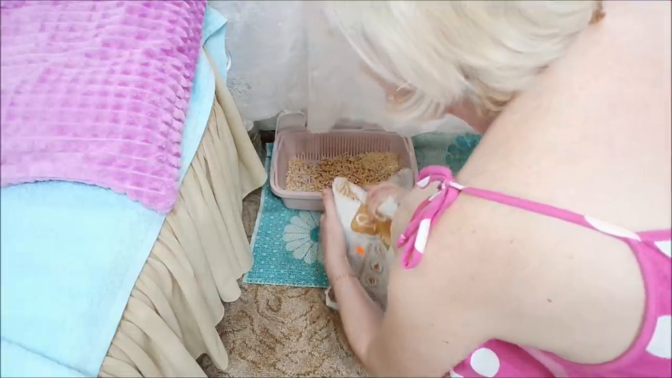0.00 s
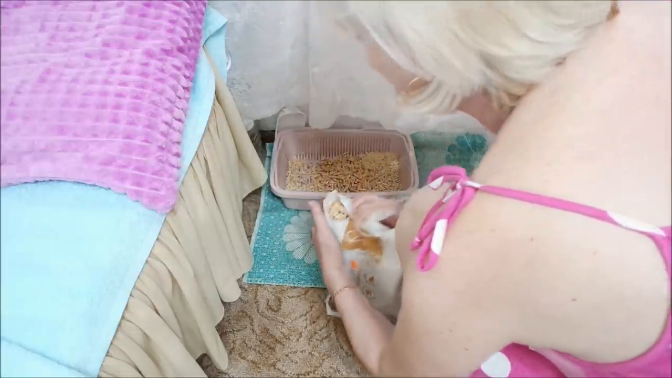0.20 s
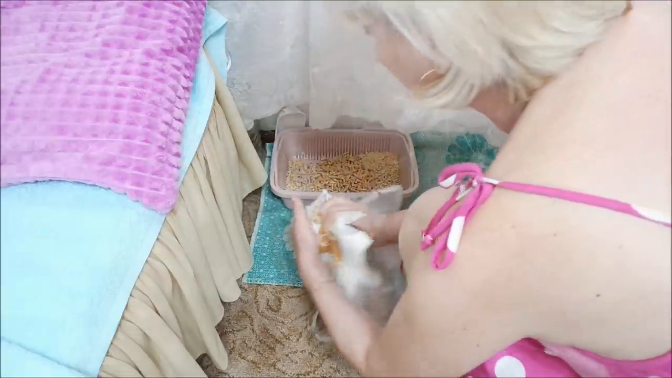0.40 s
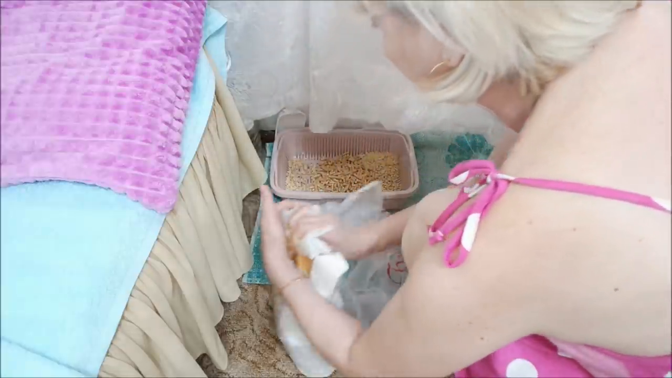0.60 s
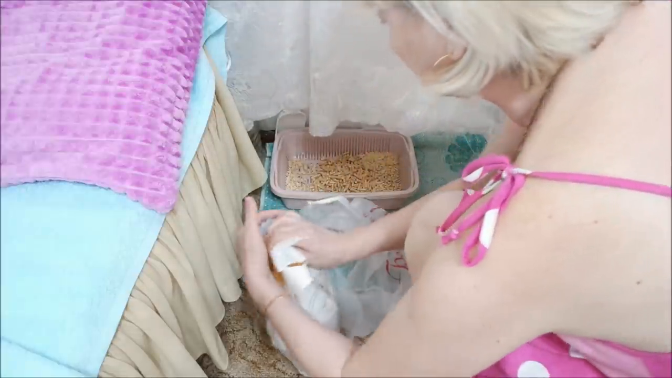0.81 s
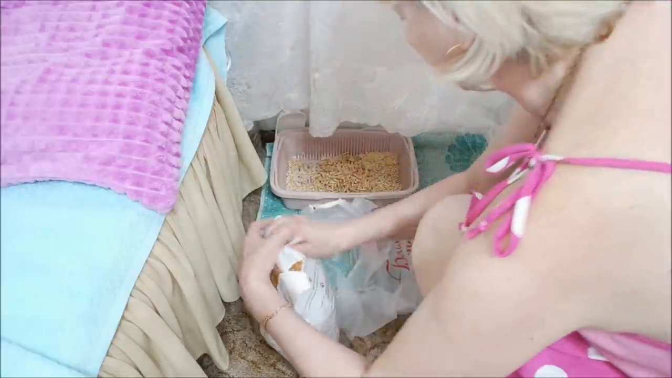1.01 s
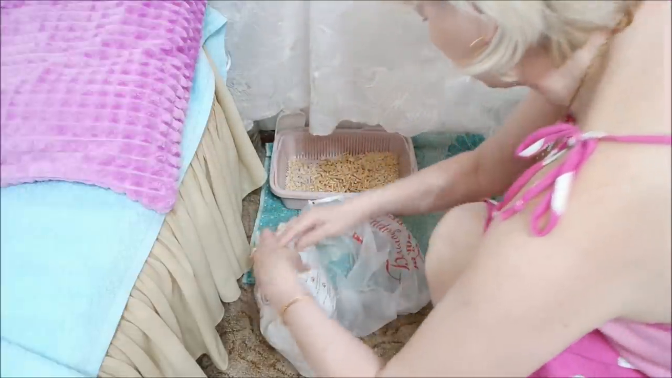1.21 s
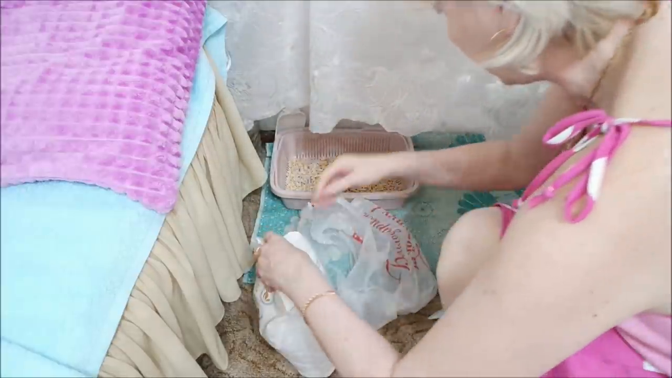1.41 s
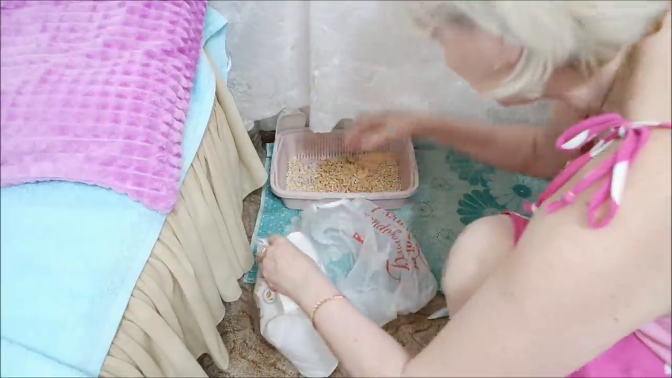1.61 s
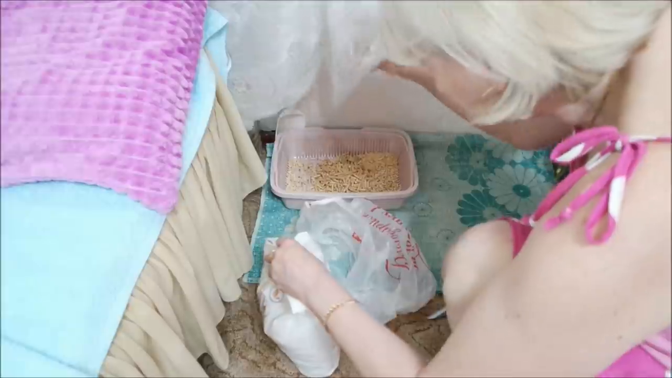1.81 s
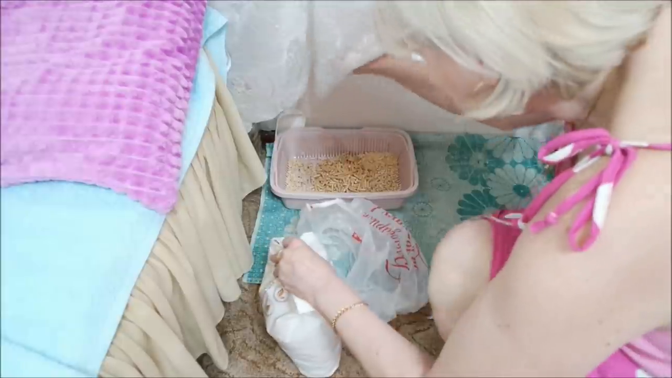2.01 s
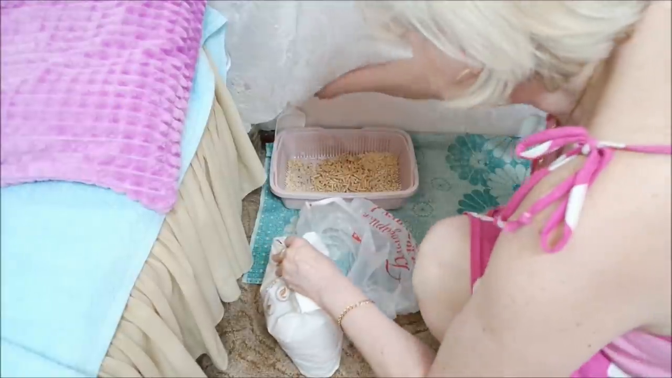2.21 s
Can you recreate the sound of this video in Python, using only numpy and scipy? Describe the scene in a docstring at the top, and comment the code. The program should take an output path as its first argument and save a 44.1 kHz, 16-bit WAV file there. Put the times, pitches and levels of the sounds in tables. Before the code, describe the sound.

A thin plastic bag holding litter pellets is folded by hand, crackling sharply with pellets clicking inside and soft floor bumps, then thins to sparse ticks and a light tray knock; small furnished room, close microphone.

```python
"""Folding a bag of pellets

Hands fold a thin plastic bag of cat litter pellets on the floor of a small furnished room, then let it go.
Creases snap (shaped noise bursts) over a fine crinkle (showers of tiny clicks); pellets shift and click inside.
The bag bumps the floor softly (clusters of low tones). As the film relaxes the snaps thin out, and the
plastic tray takes a light knock (fading tones). Behind it lie quiet room noise and a faint low hum."""
import sys
import numpy as np
from scipy import signal
from scipy.fft import rfft, irfft
from scipy.io import wavfile
from scipy.ndimage import uniform_filter1d

SR = 44100
rng = np.random.default_rng(int(sys.argv[2]) if len(sys.argv) > 2 else 0)


def output_pcm(signal):
    """Save a mono or channel-first signal as 16-bit PCM at the path in sys.argv[1].

    Samples are clipped to [-1, 1] before scaling.
    """
    pcm = np.clip(np.atleast_2d(signal).T, -1, 1) * 32767
    wavfile.write(sys.argv[1], SR, np.round(pcm).astype(np.int16))


N = 101430  # length in samples, 2.3 seconds

# Large creases of the bag. Each row: start in seconds, level at 2.5 kHz in dB before SNAP_DB is added,
# levels at 450 Hz, 1.2 kHz, 5.5 kHz and 11 kHz in dB relative to that at 2.5 kHz, main resonance in Hz.
CREASES = [(0.233, -25.5, 6, 5, -2.5, -10, 990), (0.251, -27.5, -13, 6.5, 0, -12, 1020),
           (0.265, -21, 6.5, 3.5, 0, -3.5, 3900), (0.342, -23, -9.5, 2.5, -2.5, -3.5, 680),
           (0.404, -31, -7, -13, 5.5, -4, 4700), (0.437, -37, -9, -1, 5, 4.5, 3040),
           (0.479, -23, -3, -7, 0.5, -1, 4530), (0.4835, -19.5, 3, 0, -2.5, -25, 4580),
           (0.535, -23, -5, -1, 2.5, -1, 1620), (0.5453, -17, -8, -0.5, 1.5, 2.5, 1710),
           (0.567, -27, -8, 5, 4, 3, 1230), (0.583, -13.5, -1, -10.5, -7, 1.5, 3400),
           (0.679, -24, -25, 8, -2, -1, 1450), (0.682, -23, -13, 10.5, 0, -20, 1240),
           (0.778, -18.5, 2, -8.5, -4, -13, 2500), (0.868, -27, -7, -11, -6, -7, 2720),
           (1.0034, -26.5, -2, -1.5, 2.5, -14, 2960), (1.05, -22, 1.5, -11, -8.5, -10, 2800),
           (1.094, -25.5, -5, -12, -1, -28, 1750), (1.12, -36.5, -12, -16, -7, 9, 6000),
           (1.139, -22, -24, -3, -7, -13.5, 2160), (1.195, -24, -0.5, 1, -9, -29, 2920),
           (1.2128, -25, 2.5, -12, -8, -13, 2180), (1.263, -16.5, -15, 3.5, -10, -12.5, 2000),
           (1.291, -25, -15, -23, -10, -12, 3170), (1.326, -24, 1, -4, -8, -9, 2500),
           (1.3453, -18.5, -4, -9, -7.5, -14, 2140), (1.4086, -24.5, -8, 2, -4.5, -10, 2700),
           (1.439, -24.5, -3, -8, 1.5, -27, 2640), (1.4461, -14.5, -2.5, -2.5, -6.5, -3, 2720),
           (1.4773, -16.5, -8, -2.5, -2.5, -7.5, 2130), (1.521, -26, -22, -5, -10, -13, 1630),
           (1.564, -31, -6, 2, -1.5, -30, 4350), (1.575, -29.5, -18, -2, -5, -18, 2170),
           (1.593, -19.5, -2.5, -14.5, -5.5, -3, 1900), (1.609, -29, -15, 8, -3, -10, 1670),
           (1.6509, -33.5, -8, 1, -3, -51, 1600), (1.67, -29, -11, 3.5, -1, -44, 940),
           (1.681, -36, -21, -15, 1, 1, 1130), (1.693, -18.5, -10, -2.5, -4.5, -6, 1020),
           (1.8512, -30.5, -11, -3, -3.5, -9, 1030), (1.9, -26.5, -6, -5.5, -14.5, -25, 1210),
           (1.941, -30.5, -5, -8, -6.5, -2.5, 2640), (1.954, -33.5, -4, -2, -8, -11, 2850),
           (1.997, -20.5, -9.5, 0.5, -5, -3.5, 1140), (2.085, -37.5, 2.5, -0.5, 3.5, -11.5, 4900),
           (2.159, -30.5, 8.5, -5.5, 2, -4.5, 1045), (2.2519, -40, 0, 4.5, 3, -4.5, 1010)]
# Frequencies at which the colour of a snap is set, in Hz.
SNAP_BANDS_HZ = [30, 130, 450, 1200, 2500, 5500, 11000, 16000]
# Handling of the film. Each row: time in seconds, level in dB before CRINKLE_DB is added.
CRINKLE_LEVEL = [(0, -41), (.14, -46.5), (.22, -45.5), (.27, -39), (.31, -37.5), (.36, -31.5), (.45, -39),
                 (.5, -26), (.56, -31), (.63, -31), (.69, -31), (.75, -45), (.81, -38.5), (.98, -44),
                 (1.06, -40.5), (1.18, -39.5), (1.25, -32), (1.38, -44), (1.47, -32), (1.54, -49),
                 (1.73, -42), (1.82, -54.5), (1.9, -52), (2.05, -67), (2.14, -65), (2.3, -57)]
# Colour of the crinkle. Each row: frequency in Hz, relative level in dB.
CRINKLE_COLOUR = [(100, -22), (500, -23), (1200, 6), (2300, -15.5), (3500, -2.5), (5500, -0.5),
                  (8000, -0.5), (11500, 2), (15000, 2.5)]
# Pellets shifting in the bag. Each row: time in seconds, level in dB before PELLET_DB is added.
PELLET_LEVEL = [(0, -42.5), (.07, -53.5), (.16, -57.5), (.22, -41), (.26, -38.5), (.33, -42), (.39, -40),
                (.44, -45.5), (.49, -31.5), (.57, -32), (.64, -37), (.69, -32.5), (.75, -41.5), (.8, -45),
                (.97, -45), (1.07, -42), (1.18, -43), (1.26, -39.5), (1.38, -42.5), (1.46, -38),
                (1.55, -63), (1.7, -46), (1.8, -58), (1.93, -65), (2.14, -71), (2.3, -65)]
# Colour of the shifting pellets. Each row: frequency in Hz, relative level in dB.
PELLET_COLOUR = [(30, -34), (70, -5.5), (130, -1.5), (280, 3), (500, -3.5), (900, -1), (1600, -2.5),
                 (3000, -0.5), (6000, -12), (15000, -26)]
# Short ticks: single pellets clicking, and at 2.209 s the tray rattling after its knock. Each row: start in
# seconds, level in dB, main resonance in Hz.
TICKS = [(.003, -9, 910), (0.03, -12.5, 940), (0.089, -14, 950), (.171, -13.5, 1600),
         (0.384, 0, 720), (0.508, 0.5, 1310), (.555, 4, 795), (0.6463, -3, 920), (0.815, -2, 1000),
         (0.833, -1.5, 900), (0.854, -9, 1010), (1.8794, -10, 940), (2.209, -10, 1070)]
# Colour of a single pellet click. Each row: frequency in Hz, relative level in dB.
CLICK_COLOUR = [(200, -3.5), (1100, 0), (2500, -6), (9000, -19)]
# Overtones of a resonating patch, as multiples of its main resonance.
PANEL_RATIOS = [1, 2.36, 4.5]
# The bag bumping the floor. Each row: start in seconds, level in dB, middle pitch in Hz.
FLOOR_BUMPS = [(.235, -38, 222), (.272, -24, 270), (.385, -37.5, 176), (0.47, -38, 151), (0.565, -33, 270),
               (0.587, -31, 111.4), (0.692, -29.5, 108.5), (1.262, -36.5, 160), (1.446, -38, 180),
               (1.593, -36, 382), (1.897, -42.5, 165), (1.997, -39, 170), (2.169, -39, 124)]
# Ring of the tray. Each row: pitch in Hz, level in dB relative to KNOCK_DB, seconds to fade by 60 dB.
TRAY_TONES = [(514, -7, 0.24), (602, -7, 0.18), (695, 1.5, 0.12), (900, -9, 0.08)]
# Fading of the room's tail. Each row: frequency in Hz, seconds to fade by 60 dB.
ROOM_FADE = [(100, 0.42), (400, 0.36), (1000, 0.17), (2800, 0.16), (7000, 0.19), (15000, 0.17)]
# Colour of the room's tail. Each row: frequency in Hz, relative level in dB.
ROOM_COLOUR = [(100, 1.5), (400, -0.5), (1000, -2), (2800, -3), (7000, -7.5), (15000, -12)]
# Low resonances of the room. Each row: pitch in Hz, level in dB, seconds to fade by 60 dB.
ROOM_MODES = [(272.3, -7, 0.41), (369, -0.5, 0.37), (436.6, -3, 0.49), (578.6, 1.5, 0.2), (902, -0.5, 0.1)]
# Colour of the room noise. Each row: frequency in Hz, relative level in dB.
NOISE_COLOUR = [(20, 1), (48, -11), (70, 12.5), (170, 7.5), (500, -4), (1200, -68), (4000, -20),
                (15000, -20)]
# Low hum. Each row: time in seconds, level in dB.
HUM_LEVEL = [(0, -68), (.35, -59), (.9, -58), (2.3, -65.5)]

SNAP_DB = 24.5  # added to every snap
SNAP_SUB_DB, SNAP_BASS_DB = -45, -6.5  # at the two lowest bands, relative to 450 Hz
SNAP_AIR_DB = -1.5  # at the highest band, relative to 11 kHz
SNAP_RISE_S, SNAP_DECAY_S = 0.00047, 0.0028
SNAP_RISE_SPREAD = 0.83  # some creases give at once, others over a millisecond or two
CRACK_S, CRACK_DB = 0.00039, -2  # the sharp start of each burst
PANEL_DB, PANEL_WIDTH = 5.5, .085  # height of the main resonance, width as a share of its pitch
RIPPLE_DB, RIPPLE_HZ = 3.0, 270  # size and spacing of random bumps in the spectrum
GRAIN_DB_PER_OCTAVE = 3  # how fast a grain weakens away from its own pitch
CRINKLE_DB, CRINKLE_DECAY_S = -2.5, 0.0012
CRINKLE_PER_S, CRINKLE_SPREAD_DB = 1500, 4.2
PELLET_DB, PELLET_DECAY_S = 3, 0.000734
PELLETS_PER_S, PELLET_SPREAD_DB = 650, 5
BUMP_RISE_S, BUMP_T60_S = 0.0066, .11  # T60: time to fade by 60 dB
BUMP_SPREAD = 0.21  # spread of the tones around the middle pitch, on a log scale
KNOCK_S, KNOCK_DB = 2.1595, -37
ECHO_DB, ECHO_SPAN_S = -9, 0.01
BOUNCE_DB, BOUNCE_S = -10, .003  # floor bounce: level and longest delay
FLOOR_DB, HUM_HZ = -61.5, 48.5
CEILING, EDGE_HZ = .88, 14990  # peak limit and upper edge of the band


def amp(db):
    """Turns decibels into gain."""
    return 10 ** (np.asarray(db) / 20)


def unit(x):
    """Scales a signal to an average (rms) level of one."""
    return x / np.sqrt(np.mean(x ** 2) + 1e-20)


def read(points, hz):
    """Reads a spectrum between its points on a log-frequency axis."""
    f, value = np.transpose(points)
    return np.interp(np.log(hz + 1), np.log(f + 1), value)


def level(curve):
    """Gives the gain for each sample from a curve in dB."""
    return amp(np.interp(np.arange(N) / SR, *np.transpose(curve)))


def add(mix, s, sound):
    """Mixes a sound in at a time in seconds."""
    part = mix[max(round(s * SR), 0):][:len(sound)]
    part += sound[:len(part)]


def tint(x, colour):
    """Gives a noise a spectrum."""
    gain = amp(read(colour, np.fft.rfftfreq(len(x), 1 / SR)))
    return irfft(rfft(x) * gain, len(x))


def snaps():
    """Large creases give way one by one, each at its own spot on the bag."""
    out = np.zeros(N)
    for s, db, low, mid, high, top, panel_hz in CREASES:
        bands_db = [low + SNAP_SUB_DB, low + SNAP_BASS_DB, low, mid, 0, high, top, top + SNAP_AIR_DB]
        patch = ring(list(zip(SNAP_BANDS_HZ, bands_db)), panel_hz)
        burst = room(buckle(SNAP_DECAY_S))
        add(out, s, amp(db + SNAP_DB) * signal.fftconvolve(burst, patch))
    return out


def buckle(decay_s, size=1024, count=3):
    """A sharp broadband crack and a few milliseconds of flutter, with an energy of one."""
    t = np.arange(size) / SR
    rise_s = SNAP_RISE_S * np.exp(SNAP_RISE_SPREAD * rng.standard_normal())
    flutter = (1 - np.exp(-(t / rise_s) ** 2)) * np.exp(-t / decay_s)
    shape = flutter + amp(CRACK_DB) * np.exp(-t / CRACK_S)
    burst = shape * rng.standard_normal(size)
    for _ in range(count):  # evens out the spectrum so that the crack has no pitch
        flat = irfft(np.exp(1j * np.angle(rfft(burst))))
        loudness = np.sqrt(abs(uniform_filter1d(flat ** 2, size=48)) + 1e-12)
        burst = shape * flat / loudness
    return burst / np.linalg.norm(burst)


def ring(colour, panel_hz, size=2048):
    """One patch resonates: a broad colour, a main resonance with two overtones, and random ripples."""
    hz = np.fft.rfftfreq(size, 1 / SR)
    ripple = np.interp(hz / RIPPLE_HZ, np.arange(size), rng.standard_normal(size))
    peak = 0
    for ratio in PANEL_RATIOS:
        distance = (hz / panel_hz - ratio) / PANEL_WIDTH / np.sqrt(ratio)
        peak = peak + PANEL_DB / ratio ** 0.56 / (1 + distance ** 2)
    # Folding the cepstrum (spectrum of the log spectrum) makes the ring start at once, never early.
    cepstrum = irfft(np.log(amp(read(colour, hz) + peak + RIPPLE_DB * ripple)))
    cepstrum[1:size // 2] *= 2
    cepstrum[size // 2 + 1:] = 0
    return irfft(np.exp(rfft(cepstrum)))


def grains(curve, colour, per_s, spread_db, decay_s, low_hz, high_hz, count=20):
    """A shower of small clicks of uneven size and pitch, from many spots, following a level curve."""
    out, gain = np.zeros(N), level(curve)
    for hz in np.geomspace(low_hz, high_hz, count):
        sizes = amp(spread_db * np.minimum(rng.exponential(1, N), 3))
        train = unit(sizes * (rng.random(N) < per_s / count / SR))  # clicks at random moments
        own_colour = []
        for f, db in colour:
            octaves = min(abs(np.log2(f / hz)), 2)
            own_colour.append((f, db - GRAIN_DB_PER_OCTAVE * octaves))
        grain = signal.fftconvolve(room(buckle(decay_s)), ring(own_colour, hz))
        out += signal.fftconvolve(train * gain, grain / np.linalg.norm(grain))[:N]
    return out / np.sqrt(count)


def crinkle():
    """The handled film makes a dense shower of tiny, bright clicks."""
    shower = grains(CRINKLE_LEVEL, CRINKLE_COLOUR, CRINKLE_PER_S, CRINKLE_SPREAD_DB,
                    CRINKLE_DECAY_S, 1316, 13200)
    return amp(CRINKLE_DB) * shower


def shifting_pellets():
    """Pellets shift in the bag as a sparser shower of shorter, lower clicks."""
    shower = grains(PELLET_LEVEL, PELLET_COLOUR, PELLETS_PER_S, PELLET_SPREAD_DB,
                    PELLET_DECAY_S, 233.0, 2320)
    return amp(PELLET_DB) * shower


def clicks():
    """Single pellets drop on their neighbours with a short dull tick, and the knocked tray rattles with one
    more."""
    out = np.zeros(N)
    for s, db, hz in TICKS:
        tick = signal.fftconvolve(room(buckle(PELLET_DECAY_S)), ring(CLICK_COLOUR, hz))
        add(out, s, amp(db) * tick)
    return out


def bumps(count=7):
    """The heavy bag settles with dull thuds, each a cluster of damped low tones."""
    out, t = np.zeros(N), np.arange(SR // 4) / SR
    shape = (1 - np.exp(-t / BUMP_RISE_S)) * amp(-60 * t / BUMP_T60_S)
    for s, db, hz in FLOOR_BUMPS:
        offsets = np.linspace(-1, 1, count) + rng.uniform(-0.061, 0.055, count)
        tones = hz * np.exp(BUMP_SPREAD * offsets)
        cluster = np.sin(2 * np.pi * (tones[:, None] * t + rng.random((count, 1)))).sum(0)
        thud = shape * cluster
        # Keeps the energy the same however the tones add up.
        add(out, s, amp(db) * thud * np.linalg.norm(shape) / np.linalg.norm(thud))
    return out


def tray():
    """A light knock rings the hollow plastic tray as a few fading tones."""
    out, t = np.zeros(N), np.arange(SR // 4) / SR
    for hz, db, t60 in TRAY_TONES:
        tone = np.sin(2 * np.pi * (hz * t + rng.random()))
        add(out, KNOCK_S, amp(KNOCK_DB + db - 60 * t / t60) * tone)
    return out


def room(direct, size=12288, count=8):
    """A click in the room: direct sound, floor bounce, near reflections and a short diffuse tail."""
    t = np.arange(size) / SR
    hz, bands = np.fft.rfftfreq(size, 1 / SR), np.transpose(ROOM_FADE)[0]
    noise = rfft(rng.standard_normal(size)) * amp(read(ROOM_COLOUR, hz))
    out = np.zeros(size)
    for share, (_, t60) in zip(np.eye(len(bands)), ROOM_FADE):  # each band fades at its own pace
        fade = amp(-60 * t / t60) * np.minimum(t / .005, 1)
        band_noise = irfft(noise * read(list(zip(bands, share)), hz))
        out += band_noise * fade / np.linalg.norm(fade)
    for place, strength in zip(rng.random(count), unit(rng.standard_normal(count))):
        echo = amp(ECHO_DB) * strength / np.sqrt(count) * direct
        add(out, 0.0022 + ECHO_SPAN_S * place, echo)
    add(out, BOUNCE_S * (1 - rng.random() ** 2 / 2), amp(BOUNCE_DB) * direct)
    add(out, 0, direct)
    return out


def boom(x):
    """Low resonances of the room hang on after the handling."""
    t = np.arange(SR // 3) / SR
    modes = 0
    for hz, db, t60 in ROOM_MODES:
        fade = amp(-60 * t / t60)
        modes = modes + amp(db) * 2 * fade / fade.sum() * np.cos(2 * np.pi * hz * t)
    return signal.fftconvolve(x, modes)[:N]


def background():
    """Quiet room noise is tinted random noise; the faint low hum is one sine tone."""
    noise = unit(tint(rng.standard_normal(N), NOISE_COLOUR))
    hum = np.sqrt(2) * np.sin(2 * np.pi * HUM_HZ * np.arange(N) / SR)
    return amp(FLOOR_DB) * noise + level(HUM_LEVEL) * hum


def scene():
    """Film, pellets, floor and tray sound together in the room."""
    bag = snaps() + clicks() + crinkle() + shifting_pellets()
    return (bag + boom(bag) + bumps() + tray() + background())[None]


def record(dry):
    """The very highest peaks are rounded off, and the recorder limits the band."""
    limited = dry / (1 + (dry / CEILING) ** 6) ** (1 / 6)
    lowpass = signal.firwin(301, EDGE_HZ, window=("kaiser", 8), fs=SR)
    return signal.oaconvolve(limited, lowpass[None], "same")


dry = scene()
out = record(dry)
output_pcm(out)
```